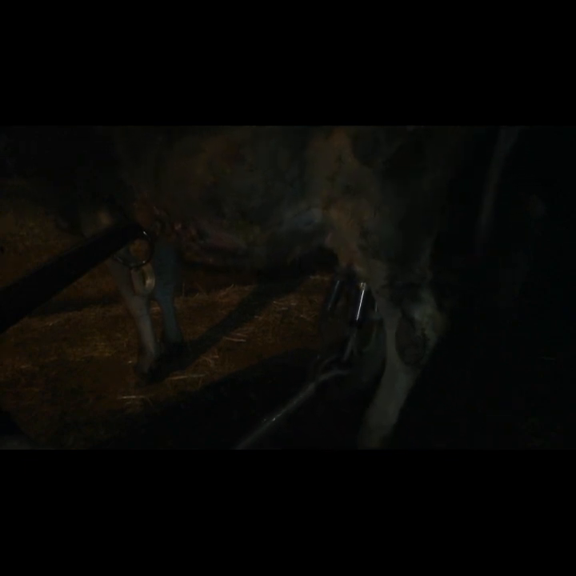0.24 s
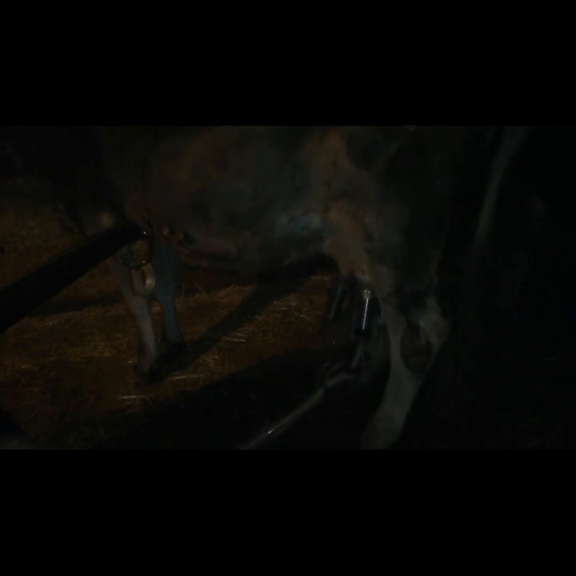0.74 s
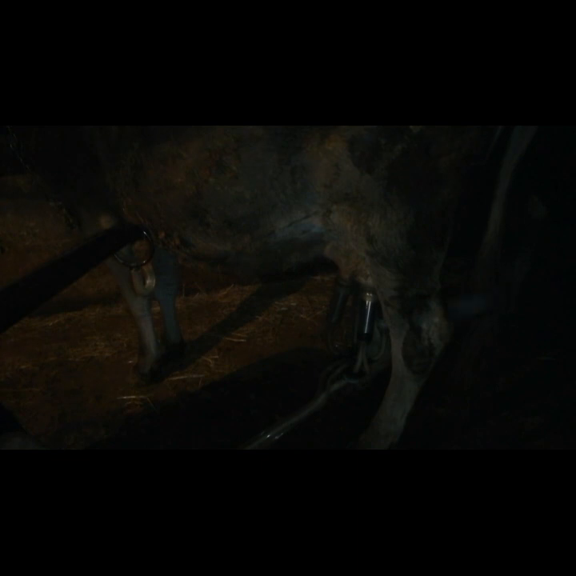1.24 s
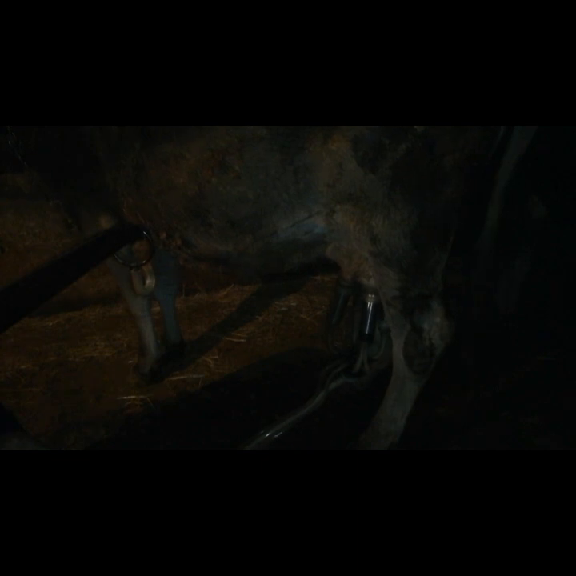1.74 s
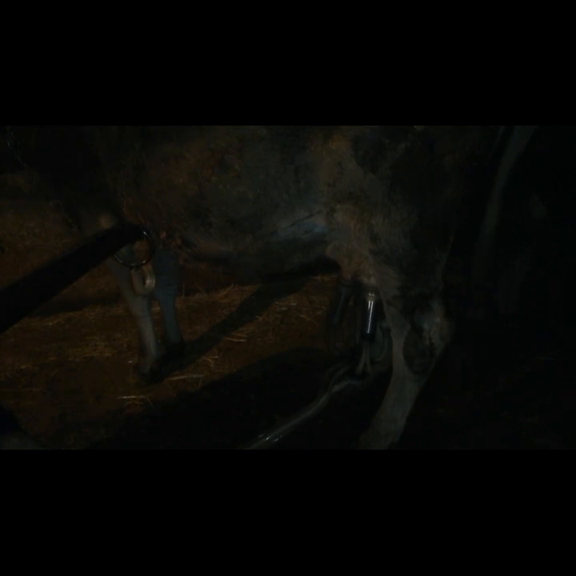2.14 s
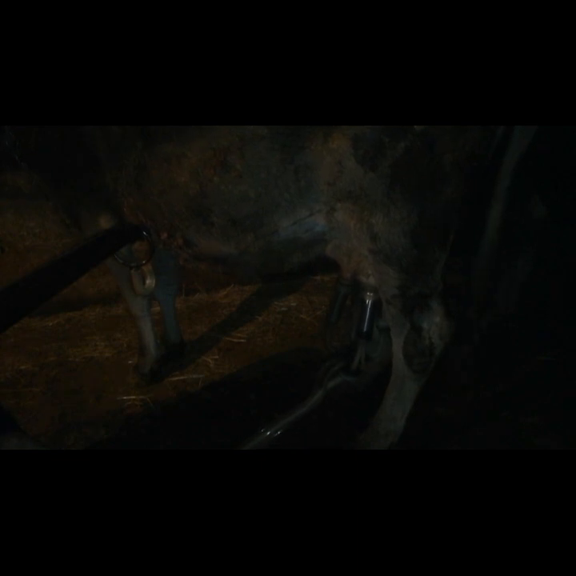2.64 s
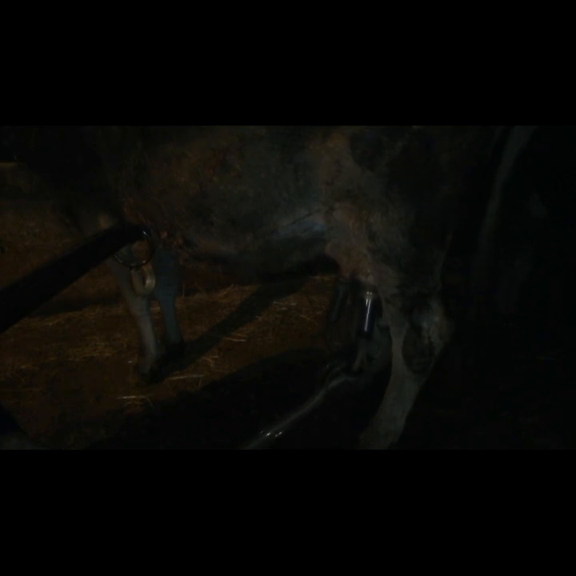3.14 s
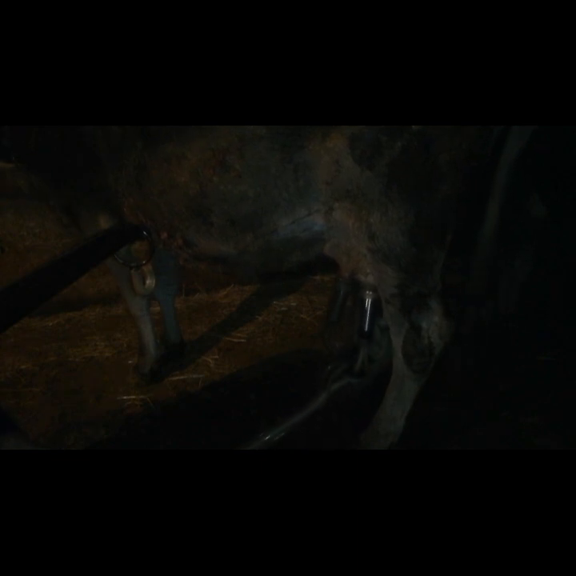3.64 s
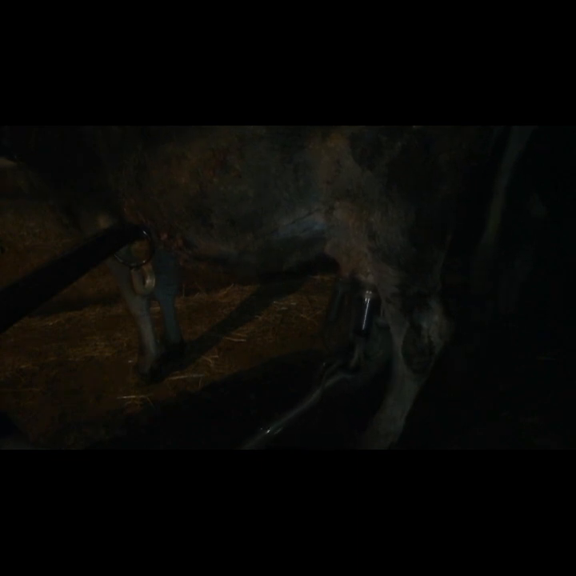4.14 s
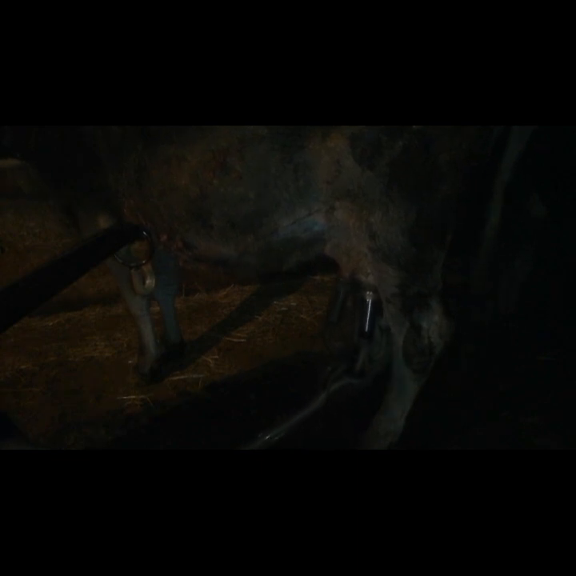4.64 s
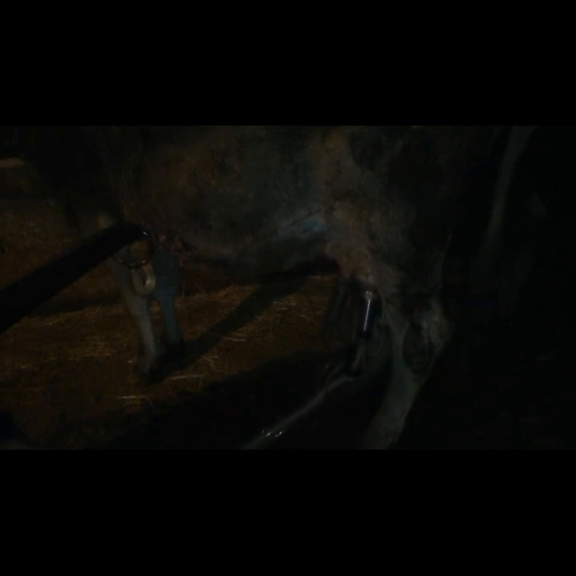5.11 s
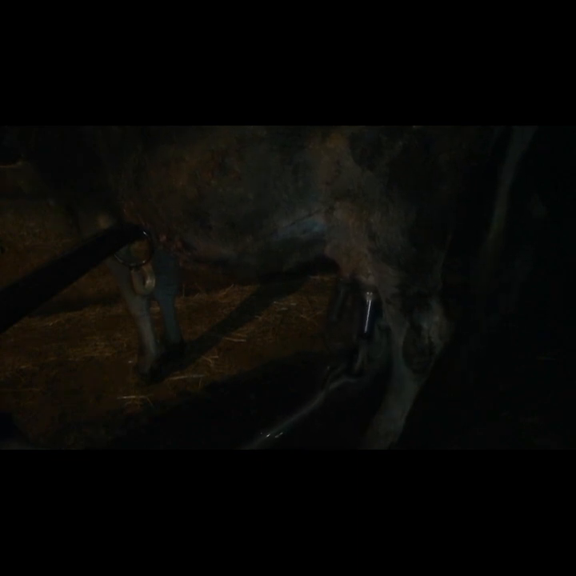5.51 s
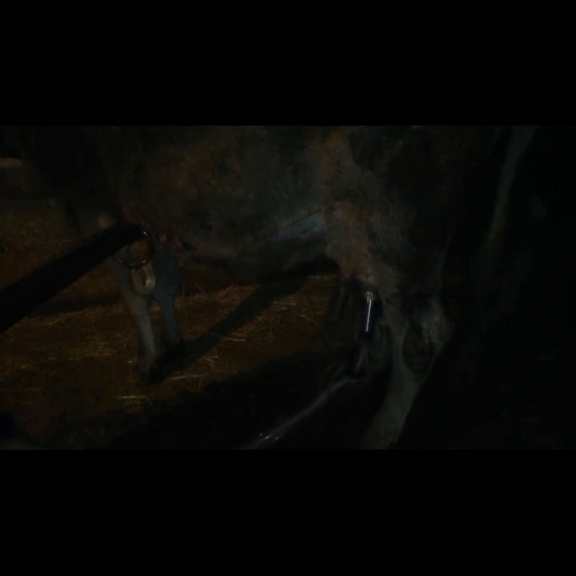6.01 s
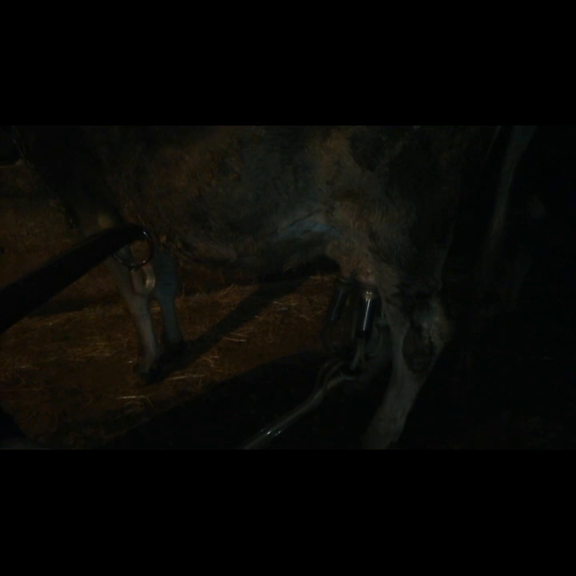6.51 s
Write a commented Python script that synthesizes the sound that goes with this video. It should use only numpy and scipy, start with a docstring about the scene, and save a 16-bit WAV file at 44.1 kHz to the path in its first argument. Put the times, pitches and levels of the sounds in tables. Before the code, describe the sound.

A rotary vacuum pump drones steadily beside a cow being milked, rough and hissy, with a rapid mechanical flutter from its turning vanes. Crisp, dry slide clicks tick out and back at a regular pace, each a tiny rattle followed by a brief breath of compressed air. A faint dull knock comes early and a clearer one past the middle. Close stereo pickup, brighter and louder on the left.

```python
"""A four-vane vacuum pump runs in a barn, left of the microphones: shaft orders hum as summed cosines,
air and casing roar as filtered noise, vane tips scrape and tick as noise pressed at fixed shaft angles.
The pulsator slide clicks to and fro as decaying modes, each stroke with a short puff of noise; two soft
low knocks are decaying sines. Gain control dips a little after loud clicks."""
import sys
import numpy as np
from scipy import signal
from scipy.fft import rfft, irfft
from scipy.io import wavfile
from scipy.ndimage import uniform_filter1d

SR = 44100
rng = np.random.default_rng(int(sys.argv[2]) if len(sys.argv) > 2 else 0)


def wav_out(sig):
    """Save sig, one row per channel (or a flat mono array), as 16-bit PCM at SR to the path in sys.argv[1]."""
    wavfile.write(sys.argv[1], SR, np.round(np.clip(np.atleast_2d(sig).T, -1, 1) * 32767).astype(np.int16))


def voltage_ratio(decibels):
    """Convert decibels (scalar or array-like) to amplitude ratios, 20 dB per decade."""
    exponent = np.asarray(decibels, float) / 20
    return 10 ** exponent


N = 298116

# right microphone against left, shadowed side: f/Hz, gain/dB
RIGHT_SHADOW = [(30, -4), (60, -5), (200, 4.5), (500, -4), (1100, -11), (1800, -6.5), (2400, -6),
                (3250, -5), (3900, -2), (5400, -10), (7000, -5.5), (8200, -14.5), (9000, -14.5),
                (10300, -21.5), (10700, -32), (11100, -29), (13300, -18), (13800, -30), (14200, -18),
                (15000, -28)]
# left-right likeness of noise after the arrival lag: f/Hz, likeness/1
NOISE_LIKENESS = [(60, 1), (300, 0.89), (1000, 0.12), (4000, 0.098), (9000, 0.16), (15000, .2)]
LAG_S = 0.00025  # right microphone is farther from the machine

# soft low knocks: t/s, f/Hz, level/dB, t60/s
KNOCKS = [(2.17, 220, -40, .15), (4.27, 328, -31, .2)]

# pulsator body modes, re stroke level:
# f/Hz, t60/s, out left/dB, out right/dB, back left/dB, back right/dB
SLIDE_MODES = [(1030, .045, -12, -25, -19, -31), (1350, .012, -22, -26, -26, -31),
               (1750, .018, -12, -17, -14, -21), (1980, .018, -5, -13, -6, -13),
               (2250, .015, -9, -16, -14, -21), (3000, .014, -18, -21, -10, -14),
               (3500, .018, -15, -11, -17, -15), (3780, .02, -15, -9, -15, -10),
               (4000, .015, -6, -16, -13, -17), (4170, .017, -13, -20, -2, -17),
               (4300, .018, -11, -18, -9, -20), (4750, .012, -11, -19, -4, -18),
               (5150, .012, -11, -20, -6, -21), (5600, .012, -13, -18, -9, -17),
               (6250, .011, -13, -21, -6, -26), (6700, .015, -10, -22, -11, -26),
               (7900, .01, -12, -21, -8, -21), (9200, .01, -12, -26, -5, -26),
               (10250, .01, -11, -33, -8, -33)]
# slide rattle before rest, out list then back list: delay/s, level/dB
SLIDE_BOUNCES = [
    [(0, -5), (.001, 0), (.00225, -4), (.00475, -8), (.0105, -14)],
    [(.0008, 0), (.00148, -3), (.0056, -9), (.0104, -12), (.016, -16)],
]
# air let out after a click, humps re stroke level: f/Hz, width/Hz, level/dB
PUFF_HUMPS = [(1050, 280, -26), (1900, 430, -20), (3800, 1600, -14.5)]
# slide goes out, then back a little before half the cycle; the cycle shortens slowly
FIRST_OUT_S, CYCLE_S, HURRY_S_PER_CYCLE2, BACK_SHARE, CYCLES = .1077, .76875, .00015, .4873, 9
OUT_DB, BACK_DB, UNEVEN_DB = -14, -14, .6  # mean stroke levels; rms spread

# air and casing noise at the left microphone, before resonances: f/Hz, density/dB per Hz
ROAR_DENSITY = [(30, -85), (60, -75.5), (140, -73.5), (300, -77.5), (520, -77.5), (850, -68), (1050, -70),
                (1600, -70), (1950, -68.5), (2300, -70), (3250, -73.5), (3900, -71), (5600, -69),
                (7000, -70.5), (10000, -67.5), (16000, -93)]
# casing resonances on the roar: f/Hz, width/Hz, gain/dB
CASING_PEAKS = [(1277, 130, 4.5), (2772, 560, 9.5), (4520, 390, 8)]

# vane-tip scrape at the left microphone, before resonances and pressure: f/Hz, density/dB per Hz
SCRAPE_DENSITY = [(4000, -90), (6000, -76.5), (7400, -70), (9000, -67.5), (10700, -70), (12500, -71),
                  (13200, -72.5), (15600, -78)]
# rotor resonances on the scrape: f/Hz, width/Hz, gain/dB
ROTOR_PEAKS = [(6700, 72, 6), (6980, 44, 14), (7780, 310, 7.5), (8110, 370, 5.5), (8680, 120, 6.5),
               (9346, 180, 10), (9800, 280, 6), (9990, 110, 8.5), (10260, 270, 5), (11140, 340, 5.5),
               (11500, 430, 7.5), (12040, 270, 10), (13000, 200, 4)]
# where the vane tips catch the bore: angle/turns, rise/turns, fall/turns, level/dB
BORE_CATCHES = [(.02, 0.024, 0.043, 3.5), (.30, 0.049, 0.035, 4.5), (.44, 0.0076, 0.036, 5),
                (.57, 0.051, 0.077, 3), (.935, 0.014, 0.025, 6)]
GLIDE_DB = -5  # scrape pressure between catches

SHAFT_HZ, START_TURN = 23.922, -.014
# shaft orders, mean rms: order/1, left level/dB, right level/dB
SHAFT_ORDERS = [(4, -44, -45), (5, -63, -61), (8, -43, -37), (9, -58, -56), (11, -54, -54), (12, -48, -49),
                (16, -53, -58), (17, -73, -59), (18, -57, -71), (19, -56, -55), (24, -51, -65),
                (26, -57, -67), (28, -57, -72), (32, -53, -58), (33, -48, -63), (36, -63, -53),
                (37, -55, -73), (40, -53, -57), (41, -57, -68), (44, -52, -64), (47, -54, -64),
                (49, -56, -61), (50, -54, -66), (51, -47, -58), (52, -40.5, -52.5), (53, -48, -57),
                (54, -45, -53), (56, -51, -58), (58, -57, -67), (77, -52, -69), (81, -53, -71),
                (104, -53, -59), (106, -47, -59), (109, -53, -55), (110, -44, -53), (111, -51, -64),
                (112, -45, -57), (113, -47, -55), (114, -42, -52), (115, -45, -58), (116, -49, -58),
                (117, -42.5, -52), (118, -49, -57), (120, -48, -54), (121, -49, -56), (122, -51, -69),
                (124, -52, -56), (126, -53, -60), (177, -53, -71), (181, -54, -63), (188, -47, -59),
                (190, -54, -70), (195, -54, -68)]
# angle where each casing resonance rings loudest, higher orders later:
# f/Hz, angle/turns, spread/turns per order
CASING_RINGS = [(190, .10, 0), (1255, .11, .13), (2784, .33, .03), (4540, .52, .03)]
# random phase scatter of the orders, rms: f/Hz, scatter/cycles
ORDER_SCATTER = [(200, .03), (250, .4), (1000, .4), (1200, .06), (4500, .17)]
# hum phase lag, right behind left: f/Hz, lag/cycles
HUM_LAG = [(200, .02), (570, .33), (800, .0), (1250, .05), (2700, .55), (4500, 1.2)]
SINK_DB_PER_S = 0.5  # orders 10 to 19 sink slowly

BAND_LIMIT_HZ = 15740


def read(points, hz):
    """Table value at hz, linear on a log-frequency axis."""
    f, value = np.transpose(points)
    return np.interp(np.log(hz + 1), np.log(f + 1), value)


def peaked(hz, peaks):
    """Amplitude gain of a flat response with resonant humps summed in power."""
    power = 1
    for f, width, db in peaks:
        power = power + (voltage_ratio(db) ** 2 - 1) / (1 + (2 * (hz - f) / width) ** 2) ** 2
    return np.sqrt(power)


def wander(count, hz):
    """Slow random curves of unit spread, hz knots per second."""
    knots = rng.standard_normal((count, int(N / SR * hz) + 4))
    at = np.arange(N) / SR * hz
    curves = [np.interp(at, np.arange(knots.shape[1]), k) for k in knots]
    return np.array(curves) * np.sqrt(3 / 2)  # restores the spread lost between knots


def stereo(drive, other, gain):
    """Colours noise; right gets it later, through the shadow and partly replaced by other noise."""
    hz = np.fft.rfftfreq(N, 1 / SR)
    like = np.clip(read(NOISE_LIKENESS, hz), 0, 1)
    left = rfft(drive)
    lagged = left * np.exp(-2j * np.pi * hz * LAG_S)
    right = like * lagged + np.sqrt(1 - like ** 2) * rfft(other)
    right = right * voltage_ratio(read(RIGHT_SHADOW, hz))
    return irfft(np.array([left, right]) * gain(hz) * np.sqrt(SR / 2), N)  # unit density per Hz


def turns():
    """Shaft angle in turns; the slipping motor hunts slightly."""
    t = np.arange(N) / SR
    return START_TURN + SHAFT_HZ * t + .0004 * wander(1, hz=8.)[0]


def turn_noise(angle, repeat):
    """White noise pair; power share repeat comes back the same on every turn."""
    steps = round(SR / SHAFT_HZ)
    same = rng.standard_normal((2, steps))[:, (angle % 1 * steps).astype(int)]
    repeat = np.clip(repeat, 0, 1)
    return np.sqrt(repeat) * same + np.sqrt(1 - repeat) * rng.standard_normal((2, N))


def thud():
    """Dull knocks: decaying sines with a soft start."""
    out = np.zeros(N)
    for start_s, hz, db, t60_s in KNOCKS:
        t = np.maximum(np.arange(N) / SR - start_s, 0)
        envelope = voltage_ratio(db - 60 * t / t60_s) * (1 - np.exp(-t / .008))
        out += envelope * np.sin(2 * np.pi * hz * t)
    return out


def strokes():
    """Time/s and level/dB of every slide stroke, out and back by turns."""
    cycle = (np.arange(CYCLES)[:, None] + [0, BACK_SHARE]).ravel()
    level_db = np.tile([OUT_DB, BACK_DB], CYCLES) + UNEVEN_DB * rng.standard_normal(len(cycle))
    time_s = FIRST_OUT_S + CYCLE_S * cycle - HURRY_S_PER_CYCLE2 * cycle ** 2
    return list(zip(time_s, level_db))


def slide_click(t, back, mode_draws, bounce_draws):
    """A few quick blows ring the same decaying body modes."""
    click = np.zeros((2, len(t)))
    for (delay_s, bounce_db), bounce_draw in zip(SLIDE_BOUNCES[back], bounce_draws):
        since = np.maximum(t - delay_s - np.array([[0], [LAG_S]]), 0)
        for (hz, t60_s, *levels), mode_draw in zip(SLIDE_MODES, mode_draws):
            mode_db = np.reshape(levels, (2, 2, 1))[back]
            uneven_db = .8 * bounce_draw + 1.2 * mode_draw
            gain = voltage_ratio(mode_db + bounce_db + uneven_db - 60 * since / t60_s)
            click += gain * np.sin(2 * np.pi * hz * since)
    # a small body sends out no bass
    return signal.sosfilt(signal.butter(6, 950, "high", fs=SR, output="sos"), click)


def air_puff(t):
    """Escaping air: dying noise coloured by broad humps."""
    air = rng.standard_normal((2, len(t))) * (1 - np.exp(-t / .004)) * voltage_ratio(-60 * t / .21)
    hz = np.fft.rfftfreq(len(t), 1 / SR)
    colour = 0
    for f, width, db in PUFF_HUMPS:
        colour = colour + voltage_ratio(db) * np.sqrt(SR / width) / (1 + (2 * (hz - f) / width) ** 2)
    sides = voltage_ratio(np.array([0 * hz, read(RIGHT_SHADOW, hz)]))
    return irfft(rfft(air) * colour * sides, len(t))


def pulsator():
    """Each slide stroke is a rattling click plus a puff of air."""
    t, out = np.arange(SR // 8) / SR, np.zeros((2, N + SR))
    clicks = strokes()
    draws = rng.standard_normal((len(clicks), len(SLIDE_MODES) + 5))
    for i, (start_s, db) in enumerate(clicks):
        click = slide_click(t, i % 2, draws[i], draws[i, -5:])
        at = round(start_s * SR)
        out[:, at:][:, :len(t)] += voltage_ratio(db) * (voltage_ratio(1.2) * click + air_puff(t))
    return out[:, :N]


def roar(angle):
    """Air through the pump, puffing faintly once per vane, coloured by the casing."""
    vane_db = .6 * np.cos(2 * np.pi * (4 * angle - .3))
    puffing = voltage_ratio(vane_db + .4 * wander(1, hz=12.)[0])
    near, far = turn_noise(angle, repeat=0.17) * puffing
    return stereo(near, far, lambda hz: voltage_ratio(read(ROAR_DENSITY, hz)) * peaked(hz, CASING_PEAKS))


def pressure_db(angle):
    """Light glide all round plus catches, each with a Gaussian rise and exponential fall."""
    power = voltage_ratio(GLIDE_DB) ** 2
    for turn, rise, fall, db in BORE_CATCHES:
        since = (angle - turn + .5) % 1 - .5
        shape = np.where(since < 0, np.exp(-(since / rise) ** 2), np.exp(-abs(since) / fall))
        power = power + voltage_ratio(db) ** 2 * shape
    return 10 * np.log10(power)


def scrape(angle):
    """Vane tips rub the bore harder at some angles; the room evens out what reaches the far side."""
    press_db = pressure_db(angle) + 0.49 * wander(1, hz=40.6)[0]
    near, far = turn_noise(angle, repeat=0.12)
    near, far = near * voltage_ratio(press_db), far * voltage_ratio(0.28 * press_db)
    return stereo(near, far, lambda hz: voltage_ratio(read(SCRAPE_DENSITY, hz)) * peaked(hz, ROTOR_PEAKS))


def hum(angle):
    """Shaft orders; neighbours line up into one ring per turn, and high ones waver more."""
    fade_db = SINK_DB_PER_S * (N / 2 - np.arange(N)) / SR
    ring_hz = np.transpose(CASING_RINGS)[0]
    out, drift = np.zeros((2, N)), wander(48, hz=14.)
    draws = rng.standard_normal((len(SHAFT_ORDERS), 2))
    for (order, left_db, right_db), (start_draw, lag_draw) in zip(SHAFT_ORDERS, draws):
        k = round(order)
        hz = k * SHAFT_HZ
        loose = min(k / 110, 1) ** 2
        group = k // 10  # ten orders waver together
        mode_hz, ring, spread = CASING_RINGS[np.argmin(abs(ring_hz - hz))]
        start = -k * ring - spread * (k - mode_hz / SHAFT_HZ) ** 2 / 2
        start += read(ORDER_SCATTER, hz) * start_draw
        lag = read(HUM_LAG, hz) + 0.23 * loose * lag_draw
        phase = 2 * np.pi * (k * angle + start) + (0.041 + 0.44 * loose) * drift[group]
        waver_db = (.5 + 2.4 * loose) * drift[24 + group]
        level = np.sqrt(2) * voltage_ratio(waver_db + (group == 1) * fade_db)  # rms to peak
        out[0] += voltage_ratio(left_db) * level * np.cos(phase)
        out[1] += voltage_ratio(right_db) * level * np.cos(phase - 2 * np.pi * lag)
    return out


def scene():
    """All sources at the two microphones."""
    angle = turns()
    return thud() + pulsator() + roar(angle) + scrape(angle) + hum(angle)


def band_limit(x):
    """A steep low-pass at the top of the band."""
    return signal.sosfilt(signal.butter(12, 15910, fs=SR, output="sos"), x)


def record(dry):
    """Gain control falls fast on peaks and recovers slowly; then a band limit."""
    threshold_db, hold_fall_db_per_s, slope, ease_s = -16.5, 47.0, 0.32, 0.017
    level_db = 10 * np.log10(uniform_filter1d((dry ** 2).max(0), 90) + 1e-12)
    fall_db = np.arange(N) * hold_fall_db_per_s / SR
    held_db = np.maximum.accumulate(level_db + fall_db) - fall_db
    over_db = np.maximum(held_db - threshold_db, 0)
    ease = np.exp(-1 / (ease_s * SR))
    ducked = dry / voltage_ratio(slope * signal.lfilter([1 - ease], [1, -ease], over_db))
    edge = signal.firwin(511, BAND_LIMIT_HZ, window=("kaiser", 9), fs=SR)
    mix = signal.oaconvolve(ducked, edge[None], "same")
    return band_limit(mix)


dry = scene()
out = record(dry)
wav_out(out)
```